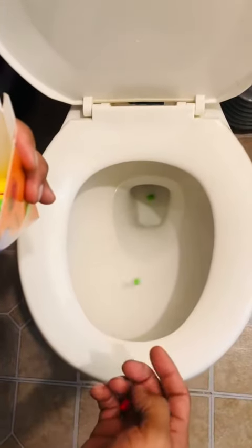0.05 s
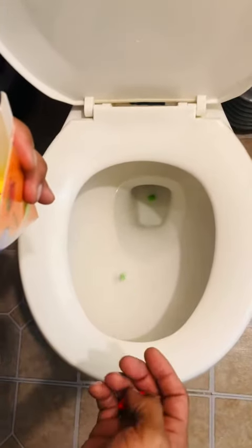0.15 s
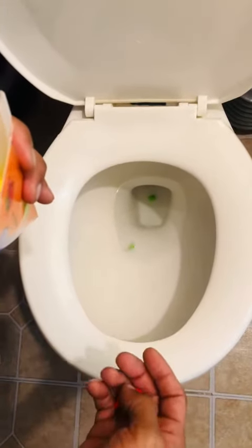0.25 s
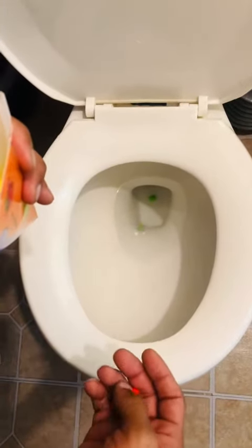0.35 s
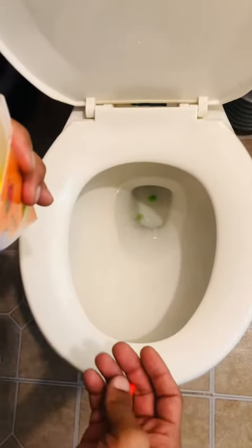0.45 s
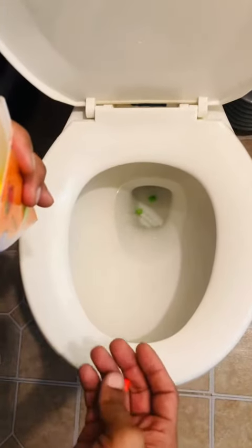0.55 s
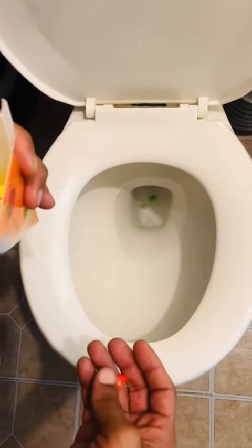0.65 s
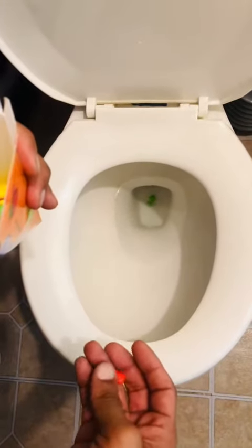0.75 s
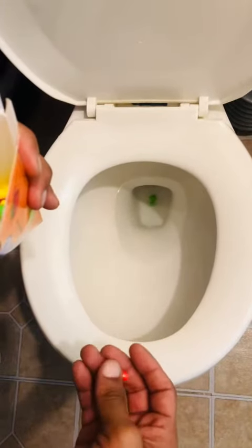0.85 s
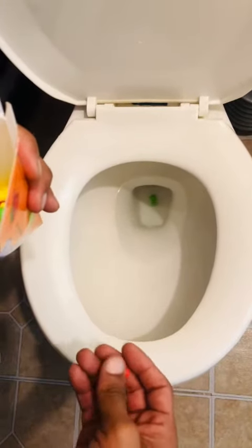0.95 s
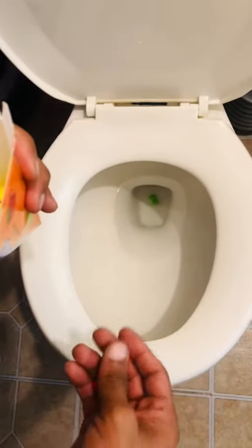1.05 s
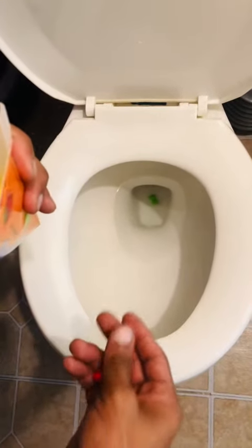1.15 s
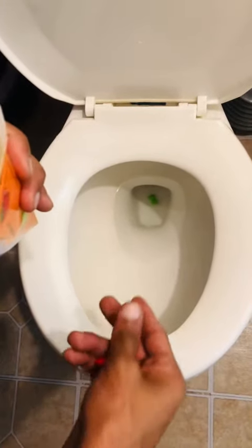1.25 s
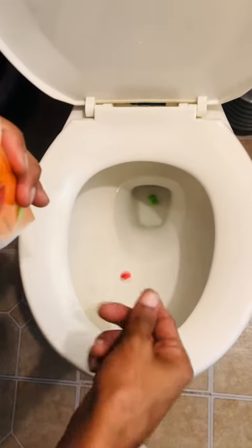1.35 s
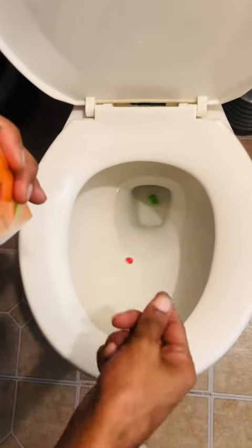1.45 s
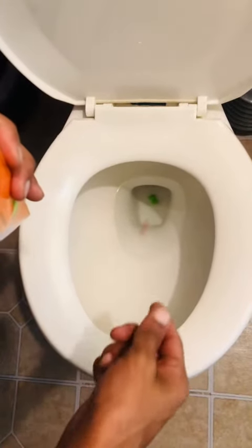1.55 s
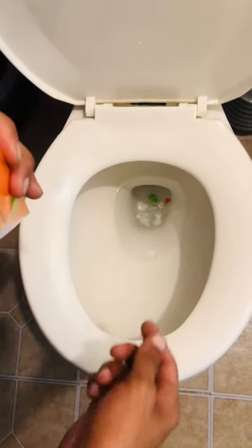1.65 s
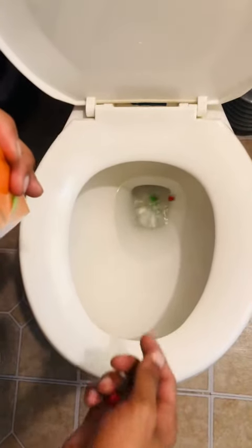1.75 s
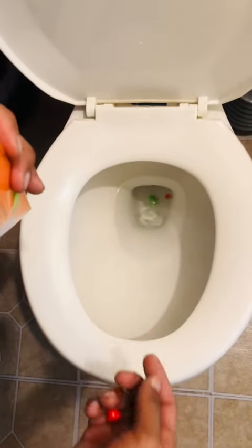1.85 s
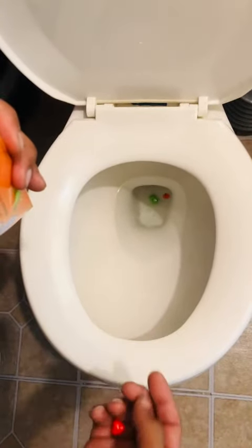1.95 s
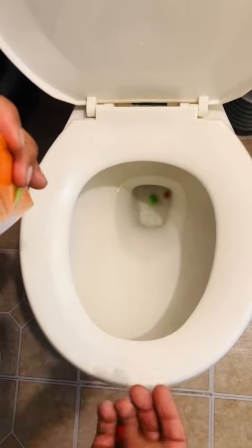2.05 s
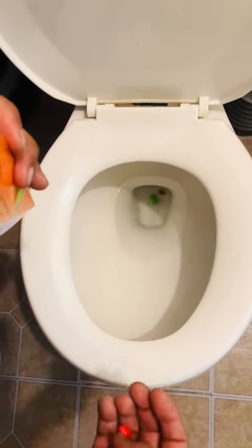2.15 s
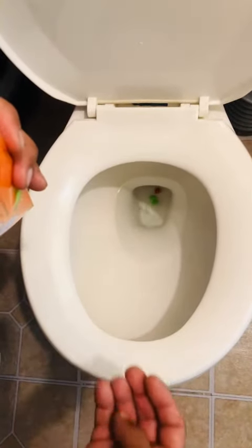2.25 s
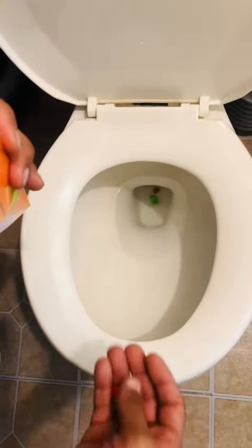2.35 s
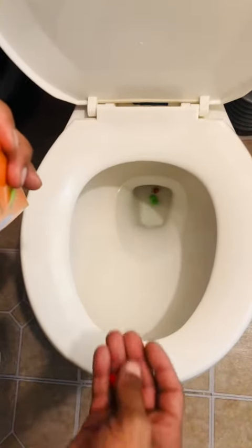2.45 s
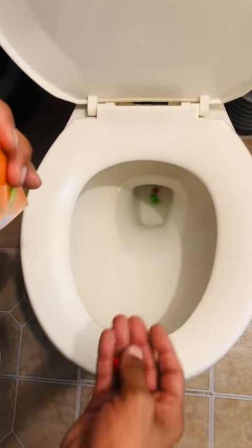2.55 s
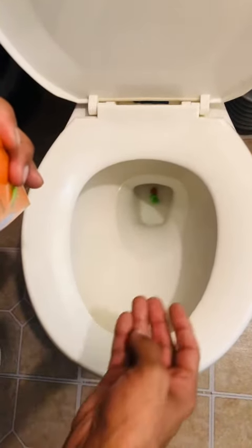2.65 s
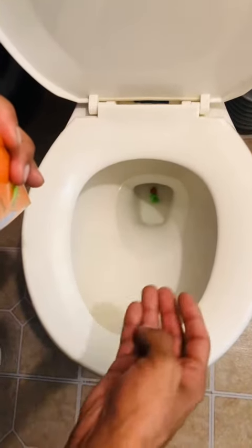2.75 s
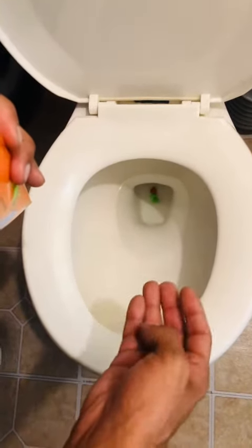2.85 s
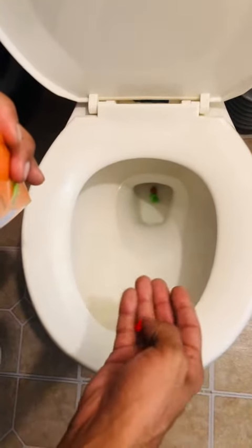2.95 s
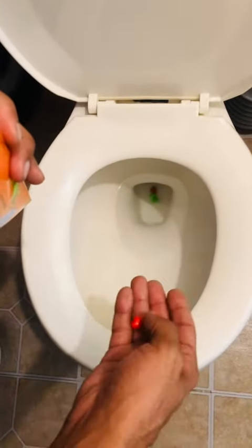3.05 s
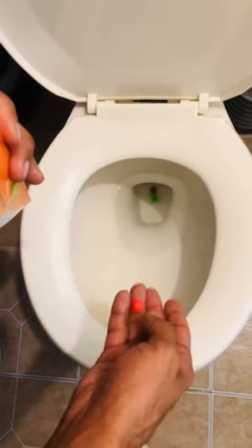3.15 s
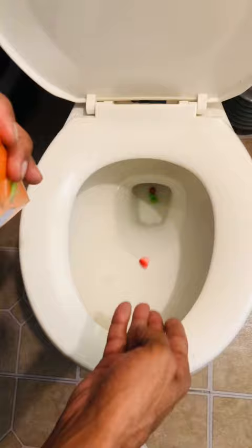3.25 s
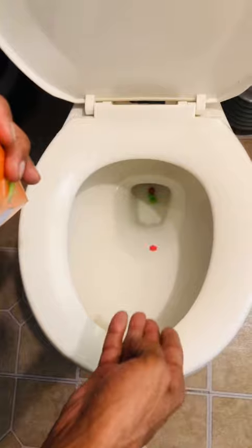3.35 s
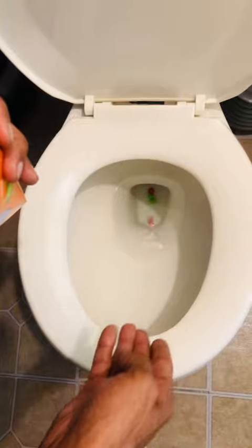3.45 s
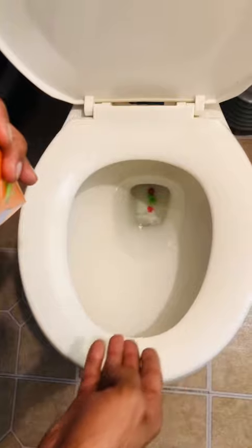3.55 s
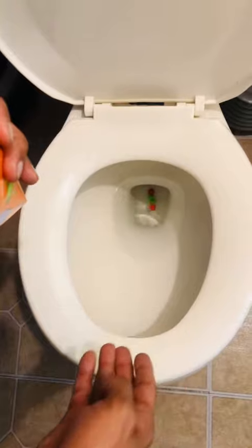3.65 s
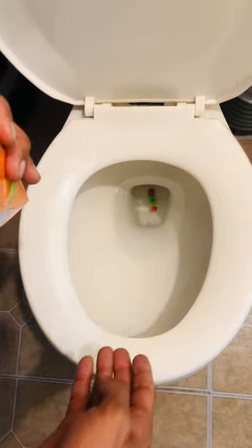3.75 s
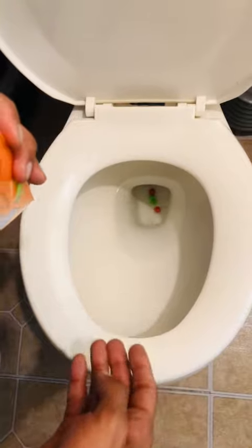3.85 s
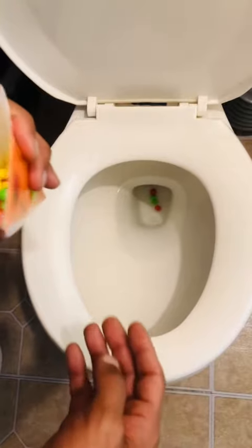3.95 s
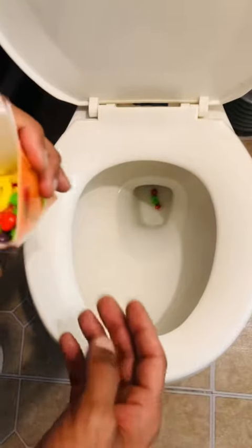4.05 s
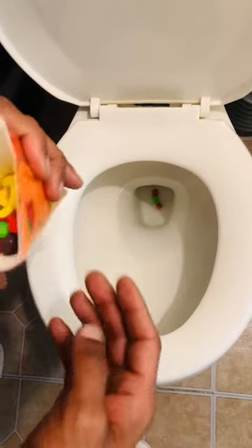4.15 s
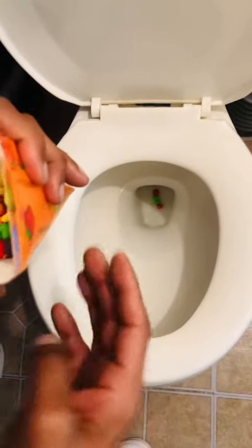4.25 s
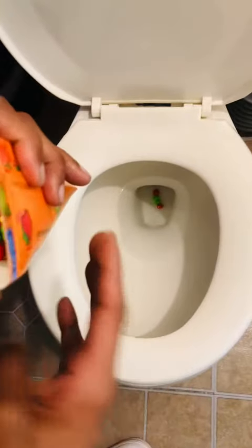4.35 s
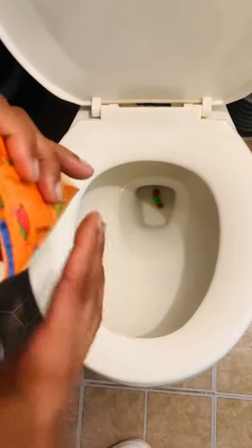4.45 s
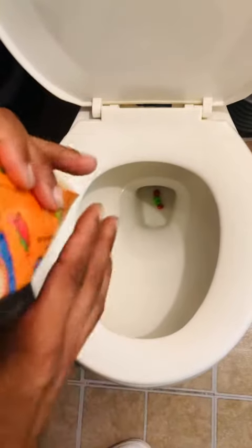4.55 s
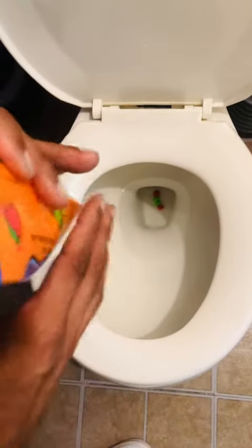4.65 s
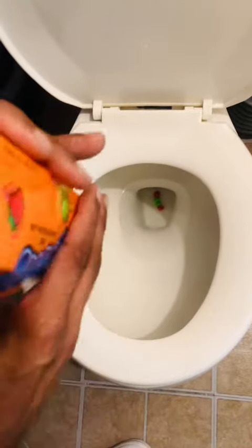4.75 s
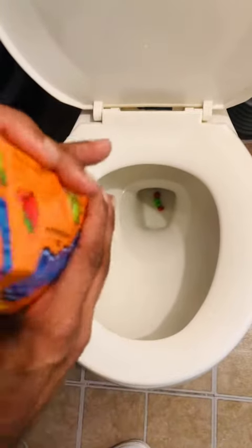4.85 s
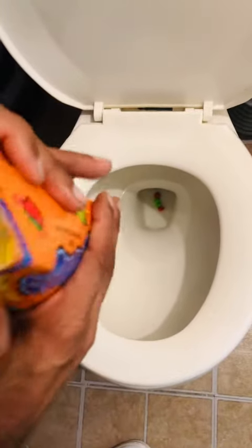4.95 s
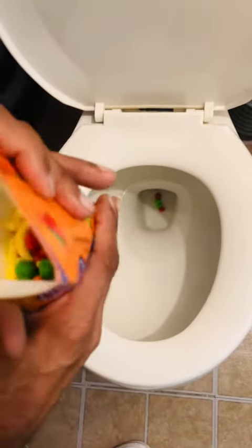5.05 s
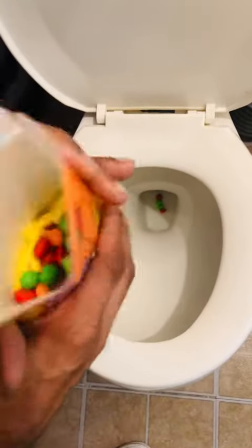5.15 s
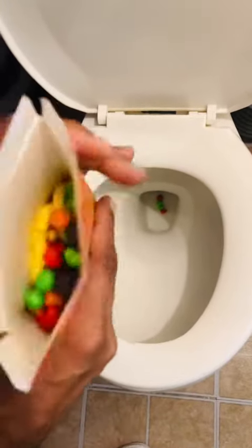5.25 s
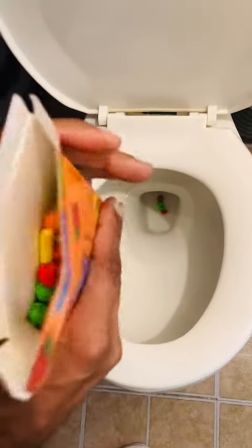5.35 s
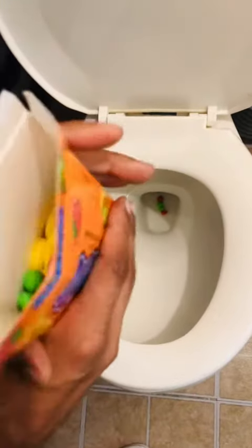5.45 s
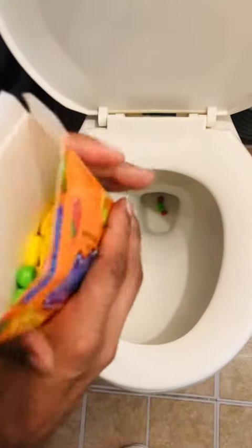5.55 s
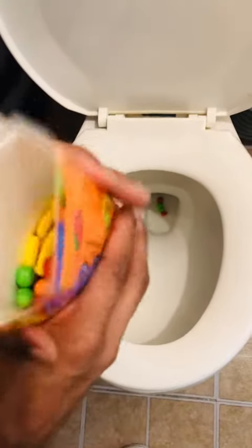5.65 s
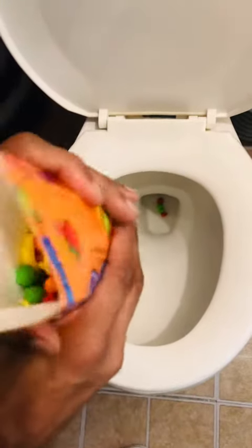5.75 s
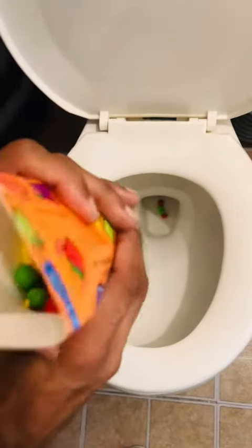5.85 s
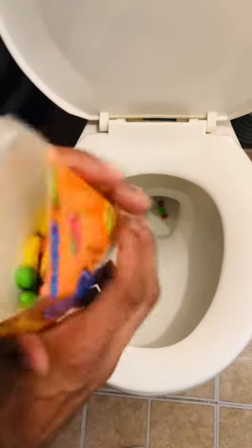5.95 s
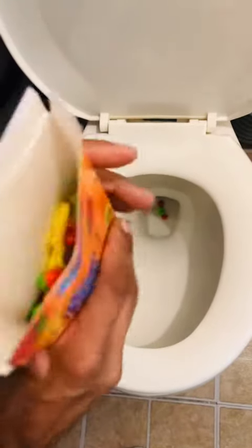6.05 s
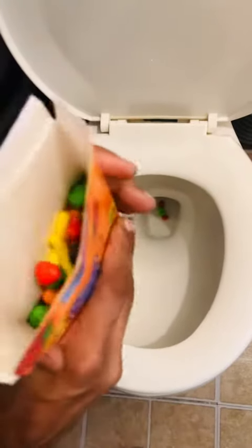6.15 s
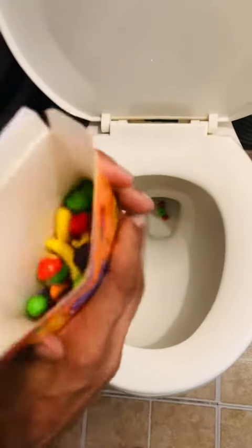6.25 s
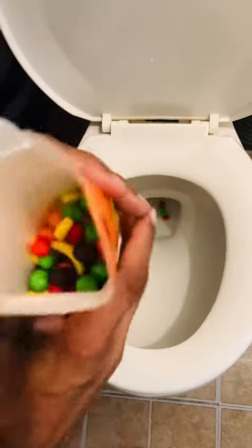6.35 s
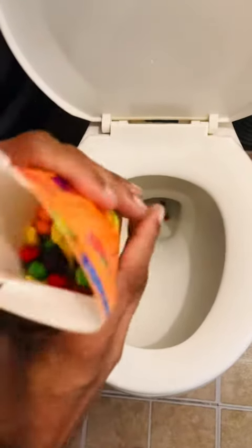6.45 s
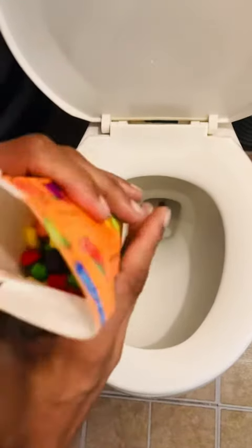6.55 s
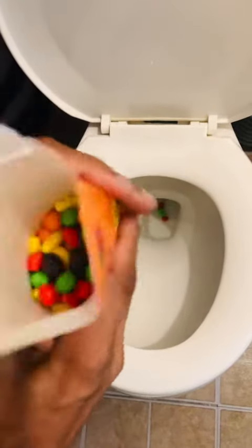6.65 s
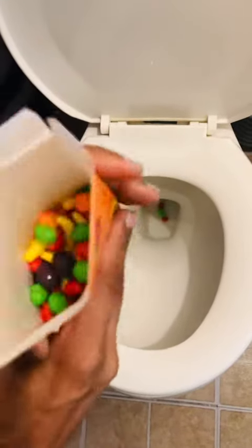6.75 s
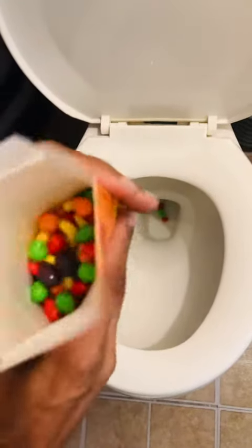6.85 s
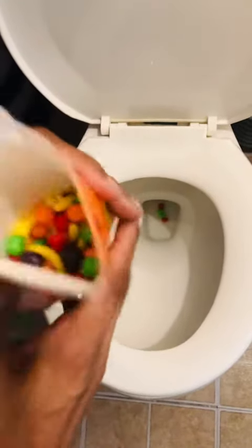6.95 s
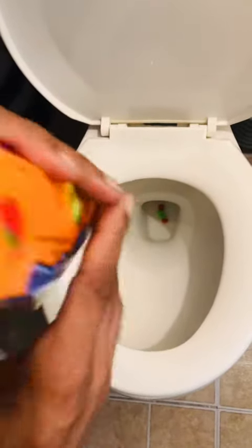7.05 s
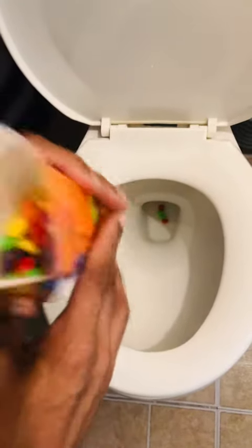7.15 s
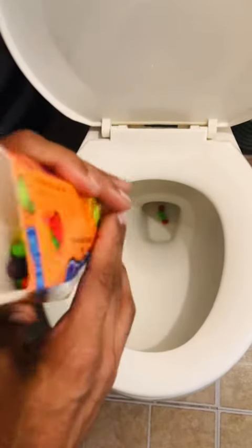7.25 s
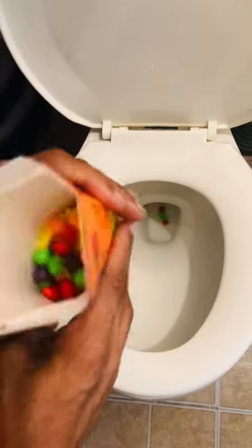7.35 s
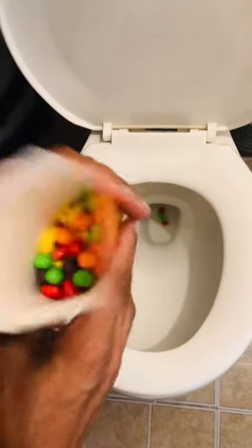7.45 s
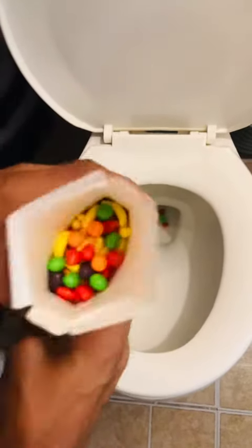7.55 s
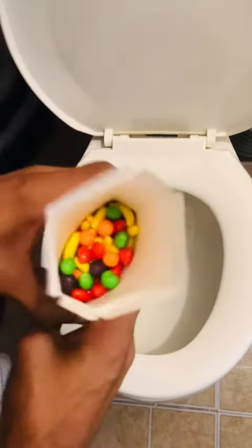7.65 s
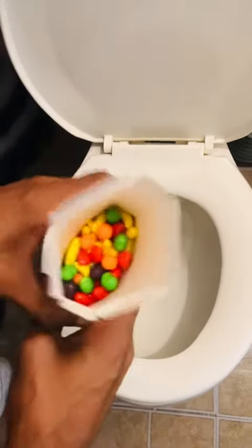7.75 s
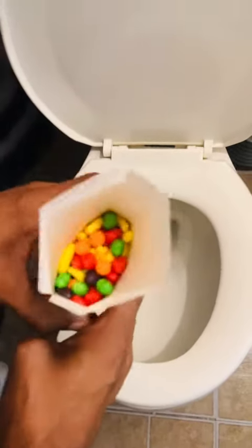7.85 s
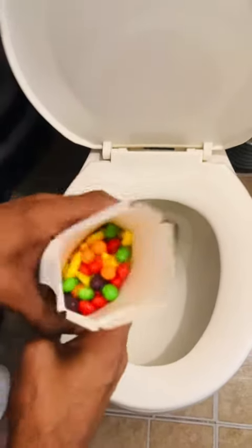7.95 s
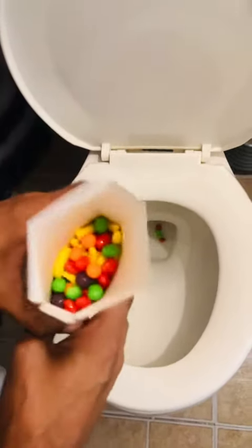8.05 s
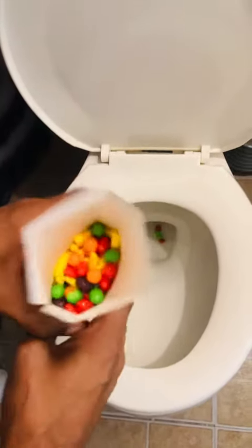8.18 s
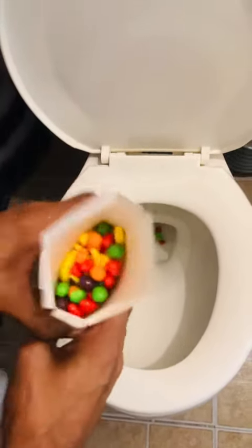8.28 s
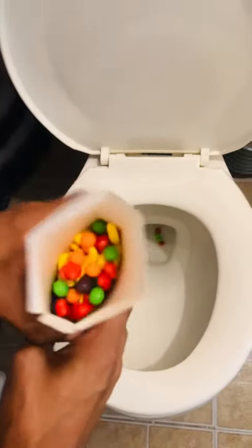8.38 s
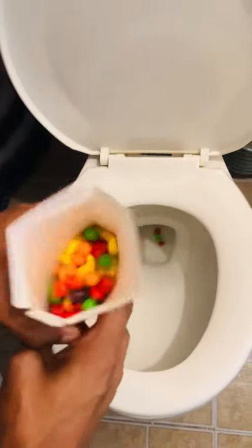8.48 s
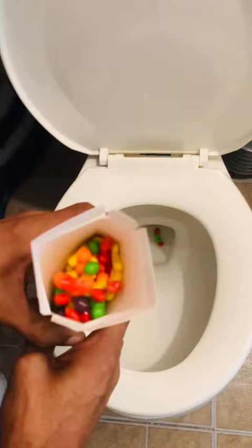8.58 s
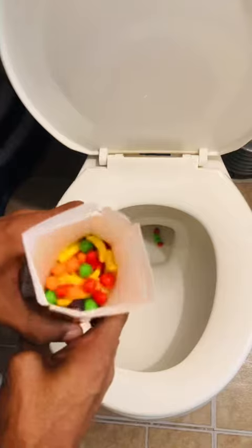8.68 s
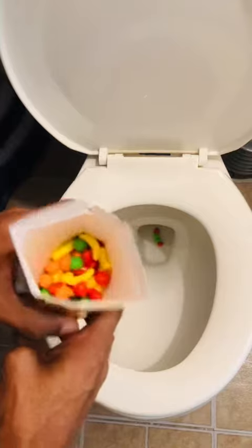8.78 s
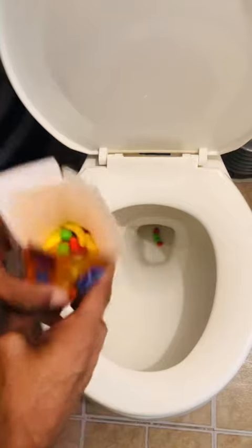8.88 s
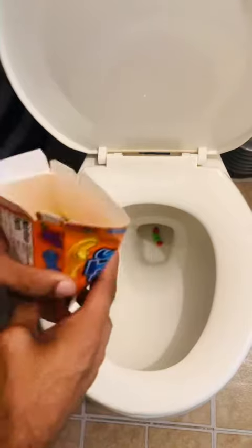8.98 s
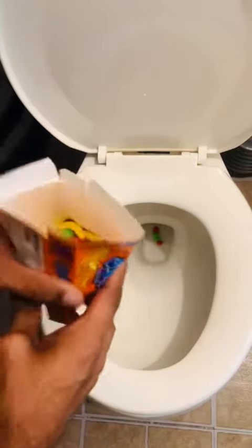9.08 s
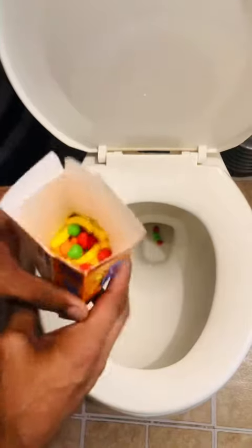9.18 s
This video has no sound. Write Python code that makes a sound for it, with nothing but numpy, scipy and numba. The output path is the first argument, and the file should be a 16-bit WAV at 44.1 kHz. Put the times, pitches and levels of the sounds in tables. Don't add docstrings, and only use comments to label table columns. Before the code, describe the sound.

Spaced sharp plinks of candy on wet porcelain in a tiled bathroom, followed by dense bright rattling of candies inside a small card box.

```python
import sys
import numpy as np
from scipy import signal
from scipy.fft import rfft, irfft, next_fast_len
from scipy.io import wavfile
from numba import njit

SR = 44100
rng = np.random.default_rng(int(sys.argv[2]) if len(sys.argv) > 2 else 0)


def makeup_ratio(level_db):
    decades = np.asarray(level_db, float) / 20
    return 10 ** decades


def int16_out(signal):
    q = np.round(np.clip(np.atleast_2d(signal).T, -1, 1) * 32767)
    wavfile.write(sys.argv[1], SR, q.astype(np.int16))


N = 406602


def rms_one(x):
    return x / np.sqrt(np.mean(x ** 2) + 1e-20)


def at_hz(points, hz):
    table_hz, value = np.transpose(points)
    return np.interp(np.log(hz), np.log(table_hz), value)


def in_time(rows, quiet=-120):
    s, level = np.transpose(rows)
    return np.interp(np.arange(N) / SR, s, level, quiet, quiet)


def add(out, s, piece):
    i = round(s * SR)
    out[i:i + len(piece)] += piece[:N - i]


def drift(rate, size=1):
    r = np.exp(-2 * np.pi * rate * size / SR)
    white = rng.standard_normal((N + SR) // size)
    slow = signal.lfilter([1], [1, -2 * r, r * r], white)[SR // size:]
    return np.interp(np.arange(N) / size, np.arange(len(slow)), rms_one(slow))


def band(x, hz, octaves):
    edges = [hz * 2 ** (-octaves / 2), min(hz * 2 ** (octaves / 2), .45 * SR)]
    return signal.sosfilt(signal.butter(2, edges, "band", fs=SR, output="sos"), x)


def low_pass(x, order, hz):
    return signal.sosfilt(signal.butter(order, hz, fs=SR, output="sos"), x)


def high_pass(x, order, hz):
    return signal.sosfilt(signal.butter(order, hz, "high", fs=SR, output="sos"), x)


def ring(clicks, hz, t60):
    r, w = makeup_ratio(-60 / (t60 * SR)), 2 * np.pi * hz / SR
    return signal.lfilter([0, np.sin(w)], [1, -2 * r * np.cos(w), r * r], clicks + 1e-18)


@njit
def bending_ring(clicks, w, r):
    out = np.zeros(len(clicks))
    for i in range(2, len(clicks)):
        out[i] = 2 * r * np.cos(w[i]) * out[i - 1] - r * r * out[i - 2] + np.sin(w[i]) * clicks[i - 1]
    return out


# pitch_hz, level_db
AIR_HISS = [(15, -54), (25, -25), (48, -16.5), (72, -25), (92, -6), (123, -10.5), (166, -14), (263, -17.5),
            (293, -9), (335, -24), (363, -18.5), (575, -26), (624, -25), (16000, -44.5)]
# pitch_hz, rms_db
MOTOR_HUM = [(59.2, -70), (118.4, -70.5), (290.7, -80.5)]
AIR_DB = -65


def ventilation():
    white = rng.standard_normal((2, N))
    hiss = np.zeros(N)
    for k, hz in enumerate(28 * 2 ** np.arange(0, 9.3, .5)):
        hiss += makeup_ratio(at_hz(AIR_HISS, hz)) * band(white[k % 2], hz, 0.86)
    hum = sum(makeup_ratio(db) * rms_one(ring(rng.standard_normal(N), hz, 2.5)) for hz, db in MOTOR_HUM)
    return makeup_ratio(AIR_DB - 1.5) * rms_one(hiss) + hum


ROOM_T60_S, ROOM_DB, WALL_CUT_HZ = 0.41, -22, 2630


def bathroom(x):
    size = next_fast_len(N + SR)
    z = np.exp(-2j * np.pi * np.arange(size // 2 + 1) / size)
    dull = np.exp(-2 * np.pi * WALL_CUT_HZ / SR)
    response = 0
    for k, lag in enumerate((rng.uniform(.005, .022, 10) * SR).astype(int)):
        loop = makeup_ratio(-60 * lag / SR / ROOM_T60_S) * (1 - dull) / (1 - dull * z) * z ** lag
        response = response + (-1) ** k * loop / (1 - loop)
    for lag in (47, 131):
        response = response * (z ** lag - .6) / (1 - 0.35 * z ** lag)
    return irfft(rfft(x, size) * response, size)[:N]


# start_s, level_db
SUNKEN_KNOCKS = [
    (.323, -54),
    (.348, -59.5),
    (0.37, -66),
]
# pitch_hz, level_db, t60_s
UNDER_WATER_MODES = [(1690, -2, 0.13), (1770, -1, 0.066), (1860, -6, 0.033), (2130, -1, 0.027),
                     (2800, -12, .06), (3600, -16, 0.16), (3670, -18, 0.13)]
# time_s, pitch_hz, level_db
BUBBLE_GLIDES = [
    [(1.606, 890, -75), (1.61, 917, -62), (1.63, 1020, -58), (1.64, 1380, -54), (1.65, 1500, -58)],
    [(1.644, 980, -67), (1.652, 1070, -54), (1.662, 1450, -56), (1.67, 2320, -54), (1.68, 2700, -66),
     (1.69, 2660, -58)],
    [(1.609, 5100, -65), (1.612, 5200, -51), (1.618, 5300, -64), (1.624, 5300, -72)],
]


def under_water():
    clicks = np.zeros(N)
    for s, db in SUNKEN_KNOCKS:
        scrape = rng.standard_normal(600) * np.exp(-np.arange(600) / (0.0055 * SR))
        add(clicks, s, makeup_ratio(db - 15.5) * scrape)
    out = sum(makeup_ratio(db) * ring(clicks, hz, t60) for hz, db, t60 in UNDER_WATER_MODES)
    for rows in BUBBLE_GLIDES:
        s, hz, db = np.transpose(rows)
        t = np.arange(s[0], s[-1], 1 / SR)
        level = makeup_ratio(np.interp(t, s, db) + 7.5 + 5 * drift(95)[:len(t)])
        phase = 2 * np.pi * np.cumsum(np.interp(t, s, hz)) / SR
        add(out, s[0], level * np.sin(phase))
    return out


# pitch_hz, level_db_per_hz
STRIKE_COLOUR = [(120, -46), (200, -11.5), (735, -31), (1620, -1.5), (1870, -27.5), (2700, -1.5),
                 (3690, -4), (3970, -10), (7140, -0.5), (16000, -6.5)]
# pitch_hz, t60_s
BOWL_DECAY = [(500, 0.27), (1320, 0.14), (3480, 0.16), (9190, 0.12), (15000, 0.094)]
# start_s, peak_db, low_db, tail_db, tilt_db_per_octave
CANDY_DROPS = [
    (0.1092, -3.5, 13, -17.5, 5.5),
    (1.5114, -2, 0, -17.5, 0.1),
    (3.4019, -6, -2, -14.5, 1),
]
# start_s, peak_db, tail_db, tilt_db_per_octave, narrowing_db (around 7 kHz)
WATER_DROPLETS = [(.0865, -48, -28, 7, 4.5), (0.097, -48, -31, .6, -2), (0.3238, -53, -14, -14, 4),
                  (.345, -50.5, 4, -10, 26), (0.5257, -49, -3.5, -8, 10), (0.5962, -49.5, -1.5, -6.5, 10),
                  (1.488, -53, -16, 2, 2.5), (1.6854, -35, 0, -6, 12), (1.9629, -52, -9.5, 8.5, -3),
                  (2.0244, -55, -12, -0.5, 1.5), (2.3875, -46.5, -19.5, 0, -2.5),
                  (2.8924, -57, -15, 5, 2.5)]
# pitch_hz, level_db, t60_s
PORCELAIN_MODES = [
    [(510, -7.5, 0.042), (1690, 3.5, 0.042), (2770, -8, 0.078), (3310, -22, 0.072), (3870, -7.5, 0.099),
     (4760, -17, 0.12), (5990, -4, 0.1), (6840, -4, .1), (8200, 7, 0.075)],
    [(1190, -9.5, .04), (2375, -6.5, 0.072), (3285, -10, .12), (4030, -2, .14), (4430, -2, 0.11),
     (6780, -11.5, .11), (7560, 0.5, .1), (8600, -1.5, 0.12)],
    [(2300, -20, 0.061), (4004, -10, 0.15), (5600, -4, .2), (5140, -16, .12), (6300, -12, .16),
     (3300, -15, .14), (5950, -5, 0.11), (6100, -8.5, 0.1), (7350, -0.5, .09), (8330, -7, .12),
     (10000, -7, 0.11)],
]
SPOT_RING_DB = [-65.5, -59.5, -65]
DROPLET_LOW_DB, CANDY_NARROW_DB = -2.5, 1.6


def drops():
    out, t = np.zeros(N), np.arange(SR // 3) / SR
    pitches = 220 * 2 ** np.arange(0, 6.3, .5)
    hits = [(*row, CANDY_NARROW_DB) for row in CANDY_DROPS]
    hits += [(s, db, DROPLET_LOW_DB, *rest) for s, db, *rest in WATER_DROPLETS]
    for s, db, low_db, tail_db, tilt_db, narrow_db in hits:
        white = rng.standard_normal((2, len(t)))
        crack = np.exp(-t / 0.00027)
        piece = np.zeros(len(t))
        for k, hz in enumerate(pitches):
            octaves = np.log2(max(hz, 2000) / 7000)
            colour_db = at_hz(STRIKE_COLOUR, hz) + low_db * (hz < 2000)
            colour_db += tilt_db * octaves - narrow_db * octaves ** 2
            t60 = at_hz(BOWL_DECAY, hz)
            early = makeup_ratio(tail_db) * makeup_ratio(-60 * t / (0.48 * t60))
            late = makeup_ratio(tail_db - 8.0) * makeup_ratio(-60 * t / (1.72 * t60))
            piece += makeup_ratio(colour_db) * band(white[k % 2] * (crack + early + late), hz, 0.51)
        add(out, s + 0.00074, makeup_ratio(db) * piece / np.abs(piece).max())
    for (s, *_), modes, ring_db in zip(CANDY_DROPS, PORCELAIN_MODES, SPOT_RING_DB):
        splash = rng.standard_normal(len(t)) * np.exp(-t / 0.022)
        add(out, s + 0.00078, sum(makeup_ratio(ring_db + db) * ring(splash, hz, t60) for hz, db, t60 in modes))
    return out


# crest_s, click_db, swell_s, fade_s, drumming_db
HEAP_SLIDES = [(4.672, -34.5, 0.044, 0.33, 2.5), (4.921, -33, 0.15, 0.023, 1.5),
               (5.129, -31.5, 0.1, 0.032, 1.5), (5.199, -20, 0.041, 0.05, -6),
               (5.255, -15.5, 0.042, 0.033, -2), (5.309, -26, 0.028, 0.15, 1.5),
               (5.428, -21.5, 0.019, 0.079, 0.5), (5.485, -36, 0.05, 0.014, 9),
               (5.632, -26, 0.047, 0.068, 2.5), (5.711, -30.5, 0.12, 0.022, 2), (5.8, -51, 0.19, 0.12, 9.5),
               (5.919, -26, 0.036, 0.15, 3), (6.061, -17, 0.13, 0.065, -1), (6.247, -24, 0.24, 0.015, 0.5),
               (6.283, -15.5, 0.025, 0.057, 2.5), (6.316, -21, 0.032, 0.067, 1.5),
               (6.45, -45.5, 0.2, 0.09, 7.5), (6.667, -21.5, 0.058, 0.11, 0),
               (6.859, -17.5, 0.064, 0.05, 0), (6.94, -39.5, 0.14, 0.06, -2),
               (7.138, -30.5, 0.078, 0.041, 9), (7.22, -40, 0.034, 0.35, 10),
               (7.649, -45.5, 0.062, 0.016, 14.5), (8.659, -32.5, 0.52, 0.099, 6.5),
               (8.962, -44, 0.011, 0.034, 0), (9.03, -53, 0.009, 0.02, 6), (9.115, -46, 0.035, .04, -3),
               (9.197, -40, 0.074, 0.053, 6), (3.925, -62, .03, 0.043, 6), (4.0, -62, 0.033, 0.033, 9),
               (4.085, -69, 0.033, 0.037, 11), (4.16, -63.5, .04, 0.033, 11),
               (4.25, -59.5, 0.035, 0.048, 5), (4.355, -51.5, 0.025, 0.042, 9),
               (4.424, -44, 0.017, 0.047, 5.5), (4.512, -47, 0.024, 0.052, 6.5)]
SLIDE_SPAN_DB = 20
SLIDE_ROUNDNESS = 1.43
BRISK_DB = -30
SLIDE_KNOCK_DB, SLIDE_KNOCK_GAIN, SLIDE_CARD_GAIN = -0.5, 0.27, 0.16


def slides():
    power, t = np.zeros((3, N)), np.arange(N) / SR
    for s, db, swell_s, fade_s, card_db in HEAP_SLIDES:
        span = slice(round((s - 2.5 * swell_s) * SR), round((s + 2.5 * fade_s) * SR))
        off_crest = np.maximum((s - t[span]) / swell_s, (t[span] - s) / fade_s)
        level = db - SLIDE_SPAN_DB * off_crest ** SLIDE_ROUNDNESS
        knock = level + SLIDE_KNOCK_DB + SLIDE_KNOCK_GAIN * (BRISK_DB - level)
        card = level + card_db + SLIDE_CARD_GAIN * (db - level)
        power[:, span] += makeup_ratio([level, knock, card]) ** 2
    return power


# start_s, peak_db, pitch_hz, rise_s
GRIP_BUMPS = [(4.185, -37, 298, 0.0013), (4.747, -52, 156, 0.008), (5.239, -30.5, 156, 0.003),
              (5.441, -41, 132, 0.0032), (6.027, -27.5, 180, 0.0046), (6.05, -41, 112, 0.0073),
              (6.084, -36.5, 75, 0.0078), (6.253, -13, 700, 0.00053), (6.266, -23, 201, 0.0052),
              (6.271, -28, 60.3, 0.0036), (6.682, -50, 114, 0.016), (6.849, -49, 80, 0.0056),
              (7.166, -43, 164, 0.0054), (7.34, -58, 181, 0.0089), (8.441, -42, 159, 0.011),
              (8.578, -35, 144, 0.0025)]
# time_s, level_db
PALM_PRESSURE = [
    (4.6, -7),
    (5.3, 0.5),
    (5.75, -8),
    (6.1, 1.5),
    (6.45, -12),
    (6.75, 1),
    (7.1, -9),
    (7.4, -20),
]
RUB_DB, RUB_HZ = -22, 184


def grip():
    out, t = np.zeros(N), np.arange(SR // 6) / SR
    for s, db, hz, rise_s in GRIP_BUMPS:
        push = t / rise_s * np.exp(1 - t / rise_s)
        add(out, s, makeup_ratio(db) * push * np.sin(2 * np.pi * hz * t))
    pressure = np.sqrt(slides()[2]) * makeup_ratio(in_time(PALM_PRESSURE))
    lumps = makeup_ratio(RUB_DB + 5.1 * drift(16, size=50))
    rub = pressure * lumps * rms_one(band(rng.standard_normal(N), RUB_HZ, 0.97))
    return high_pass(out + rub, 2, 48)


# time_s, click_db
LOOSE_ROLLING = [(3.74, -94), (3.89, -73.5), (4.22, -72), (4.37, -66), (4.5, -66), (4.585, -82), (5.0, -71),
                 (6.55, -73.5), (7.01, -53), (7.3, -38.5), (7.6, -50.5), (7.69, -55), (8.2, -46.5),
                 (8.45, -41), (8.78, -65.5), (8.96, -59.5), (9.06, -72), (9.22, -44)]
# start_s, peak_db, drumming_db, time_to_peak_s
BOX_SHAKES = [(7.169, 4.5, -2.5, 0.01), (7.21, -10, 5, 0.0091), (7.3325, 2, 2, 0.011),
              (7.3753, -4, 4.5, 0.0054), (7.484, 3, -2, 0.009), (7.6225, -16.5, -19, 0.0085),
              (7.7718, 2.5, 0.5, 0.012), (7.928, -2, 3.5, 0.015), (7.9407, 0.5, -7, 0.013),
              (8.1, 4, -3, 0.009), (8.268, 3, -1.5, 0.013), (8.4225, 1.5, -3, 0.017),
              (8.452, -10, 7.5, 0.021), (8.5587, -14, -11, 0.02), (8.578, 2, -0.5, 0.0085),
              (8.597, -0.5, 0, 0.013)]
ROLL_KNOCK_DB, ROLL_KNOCK_GAIN = 4.5, 0.26
ROLL_CARD_DB, ROLL_CARD_GAIN = 3.5, 0.24
FIDGET_DB, FIDGET_PER_S = 3, 14


def motion():
    level = in_time(LOOSE_ROLLING) + FIDGET_DB * drift(FIDGET_PER_S)
    gentle = np.clip(BRISK_DB - level, 0, 55)
    knock = level + ROLL_KNOCK_DB + ROLL_KNOCK_GAIN * gentle
    card = level + ROLL_CARD_DB + ROLL_CARD_GAIN * gentle
    power = slides() + makeup_ratio([level, knock, card]) ** 2
    t = np.arange(SR // 4) / SR - .05
    after = np.maximum(t, 0)
    for s, db, card_db, peak_s in BOX_SHAKES:
        heap = (after / peak_s * np.exp(1 - after / peak_s)) ** 1.68
        leaders = makeup_ratio(-14.5) ** 2 * np.exp(np.minimum(t, 0) / 0.0075) * np.exp(-after / 0.0068)
        stragglers = makeup_ratio(-5.0) ** 2 * np.exp(-after / 0.0071) * np.minimum(after / peak_s, 1)
        for layer, layer_db in zip(power, (-17, -18.0 + 0.097 * card_db, -14.0 + card_db)):
            add(layer, s + t[0] - .002, makeup_ratio(db + layer_db) ** 2 * (leaders + heap + stragglers))
    return np.sqrt(power)


def contacts(per_s, spread_db):
    size_db = spread_db * np.minimum(rng.exponential(1, N), 4.2)
    sizes = rms_one(makeup_ratio(size_db) * rng.choice([-1, 1], N))
    return (rng.random(N) < per_s / SR) * sizes * np.sqrt(SR / per_s)


INSIDE_T60_S, INSIDE_DB = 0.029, -26


def inside_box(clicks, white):
    power = signal.lfilter([1], [1, -makeup_ratio(-120 / (INSIDE_T60_S * SR))], clicks ** 2 + 1e-18)
    return clicks + makeup_ratio(INSIDE_DB) * np.sqrt(power) * white


# pitch_hz, level_db_per_hz
CLICK_COLOUR = [(880, -30), (1500, -3), (1740, -1.5), (2370, 4), (2560, 6), (9650, 7.5), (13800, 2),
                (16000, -41)]
# pitch_hz, level_db, t60_s
CARD_MODES = [(182, -9.5, 0.048), (293.5, -8, 0.074), (380, -9.5, 0.12), (526.3, 4, 0.0466),
              (614.4, -2, 0.066), (700, 3, 0.032), (804, -1, 0.044), (880, 2, 0.022), (1079, 2.5, 0.029),
              (1197, 3.5, 0.024), (1352, 6.5, 0.015), (1690, 8.5, 0.003), (2323, 8, 0.0078)]
# start_s, peak_db, drumming_re_click_db
LIFTED_CLICKS = [(3.7987, -48.5, -4), (3.8275, -33.5, -29), (3.895, -36, -8), (3.9287, -33, -3.5),
                 (3.968, -52, 3), (3.9828, -45, 1), (4.0001, -36.5, -4.5), (4.0783, -39, -10),
                 (4.14, -43, -5), (4.1618, -35, 1), (4.2237, -49, 8), (4.2392, -40, -8),
                 (4.2657, -33, -5.5), (4.2926, -33, -11), (4.3189, -22.5, -6), (4.3465, -16, -36),
                 (4.391, -41, -18), (4.4176, -13.5, -5.5), (4.4508, -19, -10), (4.4947, -16, -31),
                 (4.5061, -11.5, -8.5), (4.5351, -22.5, -18), (4.6287, -24, -8)]
# start_s, peak_db, drumming_re_click_db
TIPPED_CLICKS = [(4.664, -35, -7), (4.879, -19, -7), (4.9242, -26, -26), (5.087, -17, -10),
                 (5.1183, -13, -6), (5.1875, -3, -13), (5.233, 2, -17), (5.332, -12, -27),
                 (5.3852, -6, -31), (5.4182, 1, -20), (5.472, -10.5, -11), (5.572, -27, -6),
                 (5.6137, -11, -2), (5.6384, -10, -30), (5.7394, -16, -27), (5.7877, -18, -10),
                 (5.8208, -18.5, -21), (5.888, -28, 5), (5.9106, -15, -10), (6.139, -7, -23),
                 (6.2153, -5, -30), (6.253, 1, 0), (6.2719, -5, -2), (6.436, -12.5, -8), (6.467, -7.5, -9),
                 (6.579, -15.5, -12), (6.6388, -15, -12), (6.7708, -2, -35), (6.9478, -7.5, -14.5),
                 (6.9632, -10, -30)]
# start_s, peak_db, drumming_re_click_db
SETTLING_CLICKS = [(7.6229, -8.5, -34), (7.7376, -34, 6), (7.7745, -18, -37), (8.6998, -5, -18),
                   (8.734, -9.5, -23), (8.834, -24, -7), (8.9214, -24, -24), (8.9586, -21, -8),
                   (9.0273, -21.5, -7), (9.095, -22, -13), (9.111, -28, -2), (9.1621, -30, -29)]
# start_s, peak_db, drumming_re_click_db
MORE_TIPPED_CLICKS = [(4.5607, -36, -15), (4.6279, -25, -15), (4.6922, -27, -15), (4.7614, -21, -4),
                      (4.7885, -10, -23), (4.846, -16, -22), (4.8912, -14, -13), (4.899, -13, -15),
                      (4.9246, -25, -20), (4.9724, -36, -15), (4.9836, -31, -19), (4.9921, -26, -19),
                      (5.018, -40, -17), (5.028, -31, -19), (5.042, -26, -17), (5.0723, -24, -5),
                      (5.1387, -11, -20), (5.1572, -23, -17), (5.2594, 0, -13), (5.2874, -4, -15),
                      (5.2945, -1, -23), (5.3034, -2.5, -18), (5.3474, -8, -16), (5.4044, -9, -14),
                      (5.4404, 1, -25), (5.4874, -13, -16), (5.58, -27, -15), (5.5954, -23, -17),
                      (5.8628, -20, -11), (5.92, -7.5, -15), (5.9725, -18, -13), (6.3984, -16, -21),
                      (6.4117, -20, -10), (6.4424, -16, -15), (6.4577, -14, -10), (6.5114, -31, -13),
                      (6.5326, -38, -17), (6.5515, -32, -8), (6.6233, -18, -30), (6.659, -7, -21),
                      (6.8084, -12, -17), (6.8214, -5, -25), (6.836, 1, -24), (7.0429, -31, -12),
                      (7.0504, -31, -17), (7.0628, -21, -14), (7.0858, -27, -15), (7.098, -23, -15),
                      (7.1202, -10, -15)]
# start_s, peak_db, drumming_re_click_db
STRAY_CLICKS = [(7.4855, -22, -13), (7.4934, -4, -10), (7.6554, -35, -15), (7.6994, -39, -15),
                (7.9418, -16, -23), (8.0697, -20, -11), (8.1015, -4, -22), (8.2207, -29, -15),
                (8.276, -11, -2), (8.437, -3, -18), (8.5579, -7, -15), (8.5799, -3, -9), (8.668, -17, -18),
                (8.679, -21, -21), (8.688, -15, -15), (8.762, -25, -15), (8.784, -34, -15),
                (8.8205, -25, -12), (8.8867, -32, -5), (8.903, -32, -11), (8.9424, -32, -15),
                (9.0761, -37, -17), (9.1446, -26, -20)]
# time_s, tilt_db_per_octave (around TAUT_HZ)
CARD_SQUEEZE = [(3.7, -2.5), (4.3, -3.5), (4.7, -0.3), (5.1, -1.5), (5.5, -1.4), (5.9, -0.5), (6.2, .1),
                (6.5, -1.5), (6.8, 1), (7.2, -0.3), (7.5, 1), (7.8, 1.5), (8.0, 1.5), (8.15, 1.5),
                (8.3, -0.1), (8.5, 1.7), (8.7, .1), (9.22, 0.7)]
TAUT_HZ, WANDER, WANDER_PER_S = 700, .045, 5
FLEX_DB, FLEX_PER_S, CARD_SPREAD_DB = 2, 6.9, 3.5
BURST_DB, BURSTS_PER_S, TUMBLE_S = 2.3, 130, .0007
BOX_LOW_HZ, SOFT_CONTACT_HZ = 278.2, 4846


def candy_box():
    click, knock, card = motion()
    clumps = makeup_ratio(4.5 * drift(25))
    bursts = makeup_ratio(BURST_DB * drift(BURSTS_PER_S) - 1.5)
    hard_per_s = np.clip(9000 * (click / makeup_ratio(-22.5)) ** .7 * clumps, 20, 15000)
    soft_per_s = np.clip(4000 * (knock / makeup_ratio(-22.5)) ** 0.4 * clumps, 250, 15000)
    blows_per_s = np.clip(2500 * (card / makeup_ratio(-19.5)) ** .4 * clumps, 100, 15000)
    hard = click * bursts * contacts(hard_per_s, spread_db=2.5)
    soft = knock * clumps ** 0.38 * contacts(soft_per_s, spread_db=4.5)
    blows = card * contacts(blows_per_s, spread_db=3.0)
    singles = LIFTED_CLICKS + TIPPED_CLICKS + SETTLING_CLICKS + MORE_TIPPED_CLICKS + STRAY_CLICKS
    s, db, card_db = np.transpose(singles)
    taut = in_time(CARD_SQUEEZE, quiet=0)
    pitches, white = np.geomspace(1500, 15500, 20), rng.standard_normal((2, N))
    dealt = rng.uniform(0, 22.5, N)
    bright, dull, drum = np.zeros((3, N))
    own = rng.normal(0, 1, (len(s), len(pitches) + len(CARD_MODES), 2))
    at = np.round((s[:, None] + .0003 + TUMBLE_S * np.abs(own[..., 1])) * SR).astype(int)
    for k, hz in enumerate(pitches):
        colour = (-1) ** k * makeup_ratio(at_hz(CLICK_COLOUR, hz)) * np.sqrt(hz / 5000)
        t60 = 4.22 / hz + 0.0012
        octaves = np.log2(hz / 6000)
        apart = (dealt - k) ** 2
        clicks = hard * np.exp(-apart / 7.1) * makeup_ratio(-9.5 + 11.0 * min(octaves, 0))
        single_db = 1.08 * db - 23.5 + 5.16 * own[:, k, 0] + 5.8 * octaves
        clicks[at[:, k]] += np.sign(own[:, k, 1]) * makeup_ratio(single_db)
        knocks = soft * np.exp(-apart / 4.1) * makeup_ratio(-9)
        bright += colour * ring(inside_box(clicks, white[k % 2]), hz, t60)
        dull += colour * ring(inside_box(knocks, white[1 - k % 2]), hz, t60)
    for k, (hz, mode_db, t60) in enumerate(CARD_MODES):
        flex_db = FLEX_DB * drift(FLEX_PER_S, size=50) + taut * np.log2(hz / TAUT_HZ)
        clicks = blows * rng.standard_normal(N) * makeup_ratio(-32.5 + flex_db)
        single_db = db + card_db - 16.5 + 8.7 * min(np.log2(hz / 700), 0)
        clicks[at[:, -1 - k]] += makeup_ratio(single_db + CARD_SPREAD_DB * own[:, -1 - k, 0])
        bent = 2 * np.pi * hz / SR * (1 + WANDER * drift(WANDER_PER_S, size=50))
        drum += makeup_ratio(mode_db) * bending_ring(clicks, bent, makeup_ratio(-60 / (t60 * SR)))
    softened = low_pass(dull + drum, 3, SOFT_CONTACT_HZ)
    return high_pass(bright + softened, 4, BOX_LOW_HZ)


def scene():
    near = drops() + under_water() + candy_box() + grip()
    return (near + makeup_ratio(ROOM_DB) * bathroom(near) + ventilation())[None]


def top_cut(x):
    return signal.sosfilt(signal.butter(12, 16980, fs=SR, output="sos"), x)


def record(dry):
    rounded = .85 * np.tanh(dry / .85)
    cut = signal.sosfilt(signal.cheby2(14, 28, 16150, fs=SR, output="sos"), rounded)
    cut = signal.sosfilt(signal.cheby2(12, 50, 17300, fs=SR, output="sos"), cut)
    return top_cut(cut)


dry = scene()
out = record(dry)
int16_out(out)
```